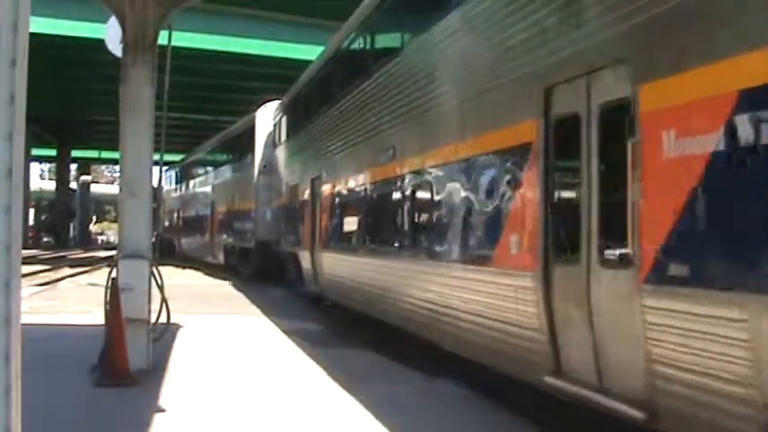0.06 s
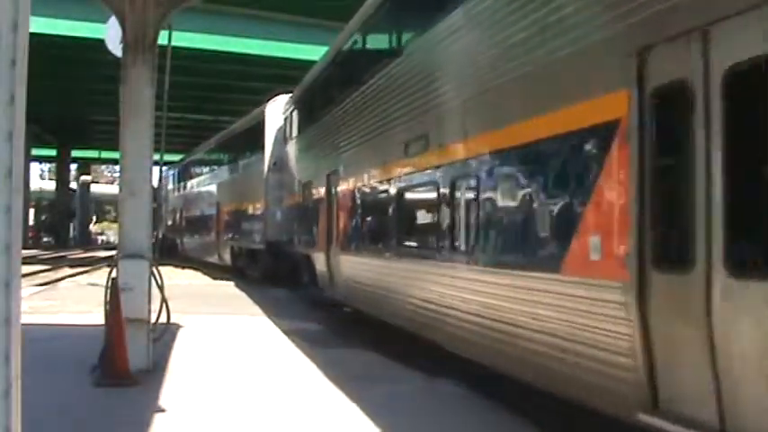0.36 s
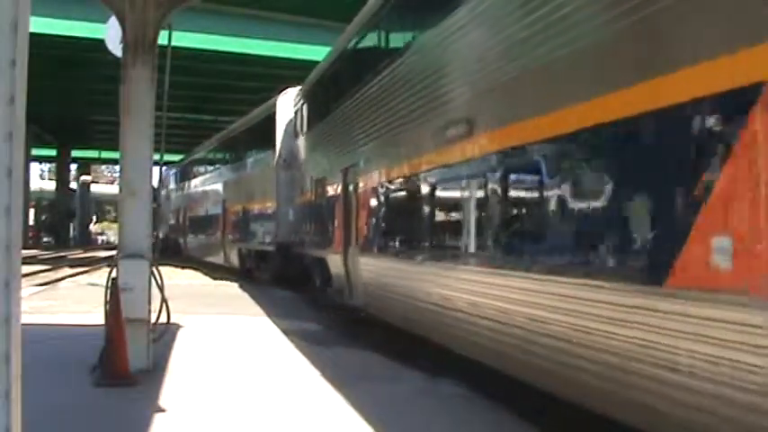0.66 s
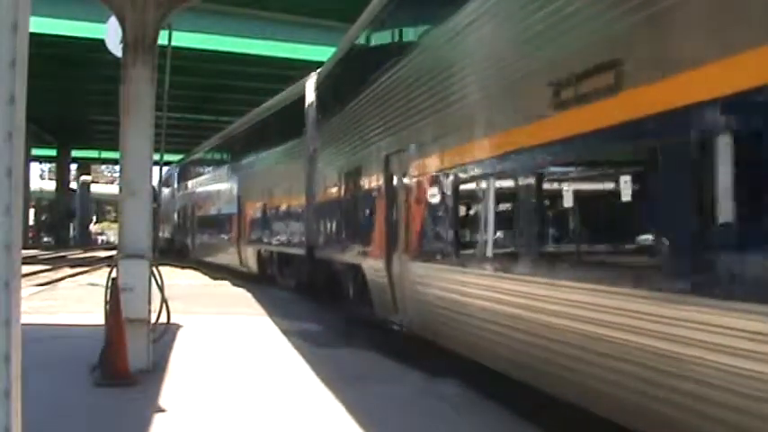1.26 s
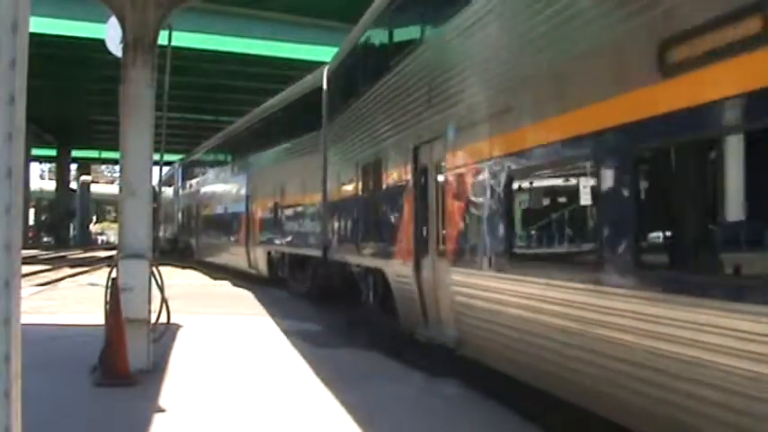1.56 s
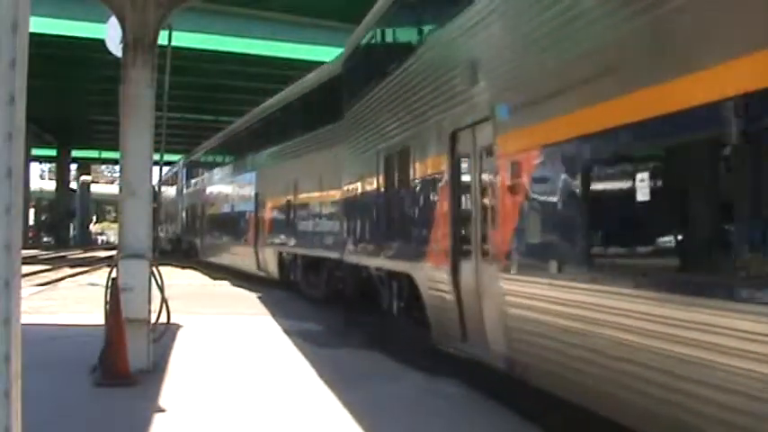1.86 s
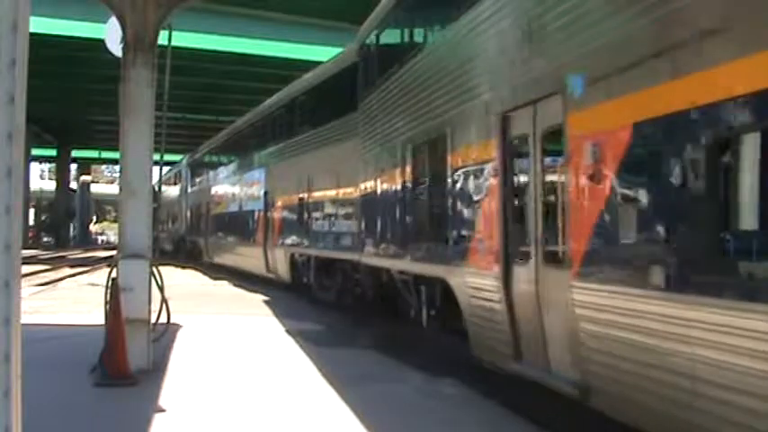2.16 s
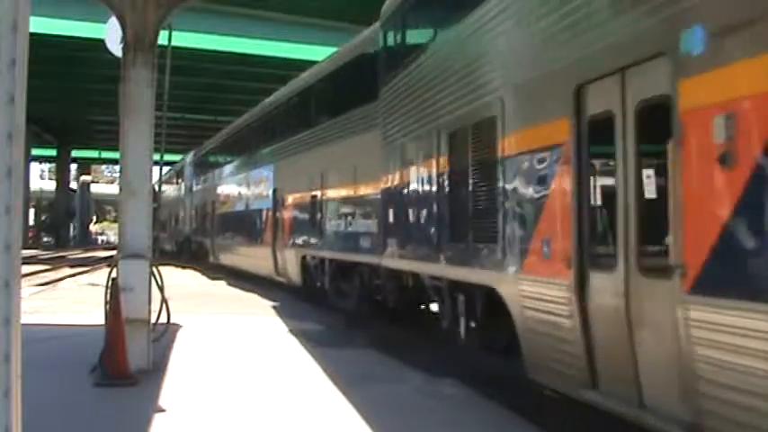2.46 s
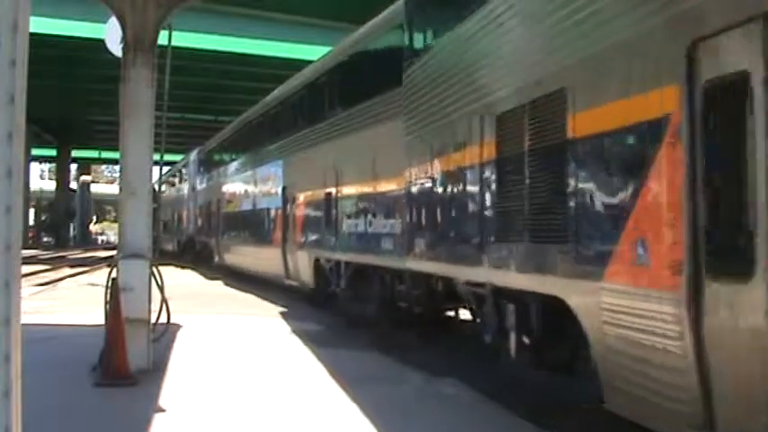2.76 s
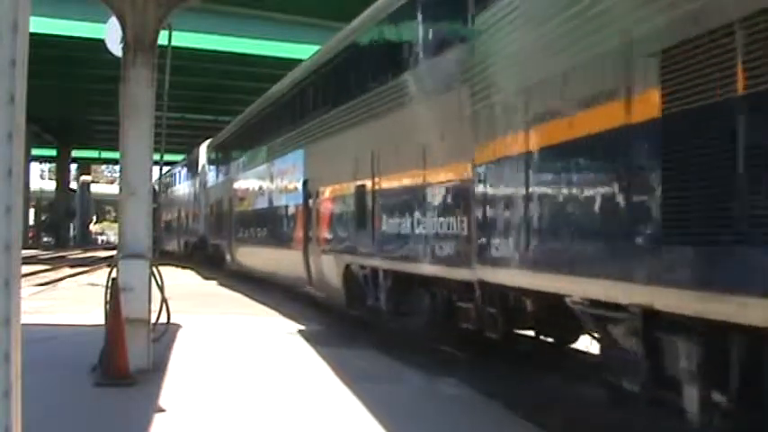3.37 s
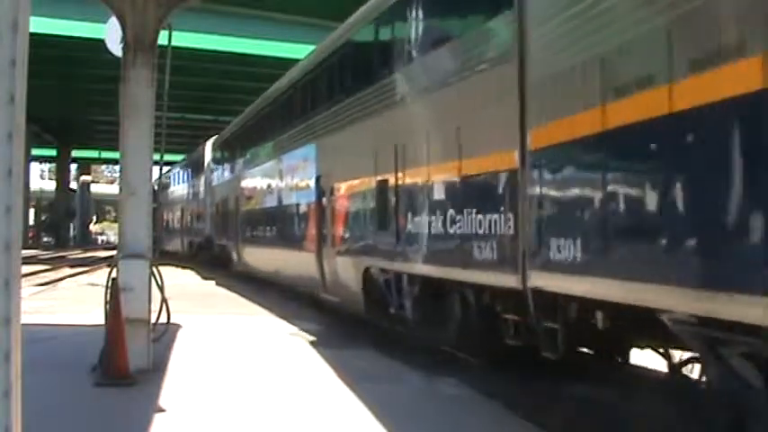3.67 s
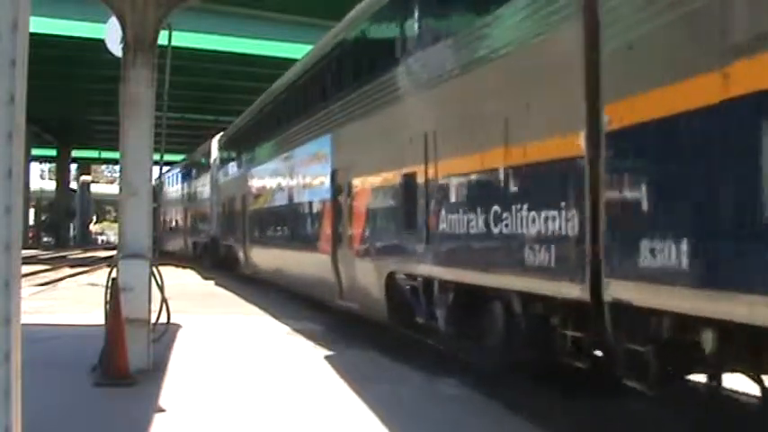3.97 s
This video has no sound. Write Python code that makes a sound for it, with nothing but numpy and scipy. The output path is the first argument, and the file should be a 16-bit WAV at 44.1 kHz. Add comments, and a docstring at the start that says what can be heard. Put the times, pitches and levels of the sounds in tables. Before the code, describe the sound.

A slow passenger train passes close to the microphone on a covered platform, bell clanging evenly over bright hissing air. Wheels clack over rail joints with short squeals, then a deep rumble builds as the hiss and echoing bell weaken.

```python
"""A passenger train rolls slowly along a roofed platform, air hissing and its bell already ringing.
The bell is struck every 0.7 s, hardest near the start; a limiter ducks the hiss under loud strokes.
From the first second on, wheels knock over rail joints and their rims (flanges) rub and sing.
About halfway the hiss fades and the rumble grows. The strokes weaken toward the end as the bell moves
away; motion shifts each echo's pitch differently (Doppler), so the bell's tones pulse against each other."""
import sys
import numpy as np
from scipy import signal
from scipy.io import wavfile
from scipy.ndimage import uniform_filter1d

SR = 44100
rng = np.random.default_rng(int(sys.argv[2]) if len(sys.argv) > 2 else 0)


def wrap_up_sound(samples):
    """Save the sound to the file named by the first command line argument, as 16-bit audio."""
    columns = np.atleast_2d(samples).T
    # keep every value between -1 and 1, then stretch to whole-number steps
    tamed = np.clip(columns, -1, 1)
    steps = np.round(tamed * 32767).astype(np.int16)
    wavfile.write(sys.argv[1], SR, steps)


N = 176400
TIME = np.arange(N) / SR
BLOCK = 40  # samples per step of a slow wander


def from_db(db):
    """Turn decibels into a gain to multiply by."""
    return 10 ** (np.asarray(db) / 20)


def rms_one(x):
    """Scale a signal so its average strength (rms) is 1."""
    return x / np.sqrt(np.mean(x ** 2) + 1e-20)


def level(rows):
    """Join (t/s, level/dB) points into a gain over time."""
    return from_db(np.interp(TIME, *np.transpose(rows)))


def at_hz(points, hz):
    """Read between (f/Hz, value) points, with octaves evenly spaced."""
    f, value = np.transpose(points)
    return np.interp(np.log(hz), np.log(f), value)


def pan(left_db):
    """Left and right gains that make the left louder by left_db."""
    return from_db(np.array([[.5], [-.5]]) * left_db)


def drift(rate_hz):
    """A smooth random wander of typical size 1, one value per block."""
    r = np.exp(-2 * np.pi * BLOCK * rate_hz / SR)
    wander = signal.lfilter([1], [1, -2 * r, r * r], rng.standard_normal(N // BLOCK + 2001))
    return rms_one(wander[2000:])


def resonate(x, hz, width_hz):
    """Make a signal ring around one pitch; white noise keeps its power."""
    r = np.exp(-np.pi * width_hz / SR)
    feedback = [1, -2 * r * np.cos(2 * np.pi * hz / SR), r * r]
    return signal.lfilter(np.sqrt((1 - r * r) / 2) * np.array([1, 0, -1]), feedback, x)


# how alike left and right sound: f/Hz, likeness (1 = the same)
STEREO_LIKENESS = [(40, .98), (200, .96), (500, .8), (1200, .76), (3000, .88), (6000, .94), (10000, .85),
                   (14000, .62)]
# how the sound leans to one side: f/Hz, left minus right/dB
STEREO_BALANCE = [(40, -3.4), (90, -3.2), (300, -.2), (700, -.8), (2000, -2), (6000, -.8), (14000, -1.3)]
def spread(pair, hz):
    """Blend two unrelated noises into left and right, as alike as suits that pitch."""
    alike = np.clip(at_hz(STEREO_LIKENESS, hz), 0, .999)
    mid, side = np.sqrt((1 + alike) / 2), np.sqrt((1 - alike) / 2)
    return (pan(at_hz(STEREO_BALANCE, hz)) * [[mid, side], [mid, -side]]) @ pair


def banded_noise(spectrum, flicker_db, flicker_hz):
    """Stereo noise of strength 1, built from half-octave bands that each flicker a little."""
    out, together = 0, drift(flicker_hz / 2)
    edges = 20.3 * 2 ** np.arange(0, 10.1, .5)
    white = rng.standard_normal((2, 2, N))
    for k, (low, high) in enumerate(zip(edges, edges[1:])):
        hz, flicker = np.sqrt(low * high), drift(flicker_hz)
        if spectrum[0][0] < high and low < spectrum[-1][0]:
            band_pass = signal.butter(2, [low, high], "band", fs=SR, output="sos")
            band = signal.sosfilt(band_pass, white[k % 2])
            gain = from_db(at_hz(spectrum, hz) + flicker_db * (together + flicker) / 2)
            out = out + np.repeat(gain, BLOCK)[:N] * spread(band, hz)
    return rms_one(out)


# steady hums of the cars: f/Hz, width/Hz, level/dB
CAR_DRONES = [(50, 8, -44), (399, 30, -37), (701, 40, -48)]
def car_drones():
    """Steady friction keeps the cars humming at a few pitches."""
    out = 0
    for hz, width_hz, db in CAR_DRONES:
        hum = resonate(rng.standard_normal((2, N)), hz, width_hz)
        hum = resonate(hum, hz, 4 * width_hz)  # trims the noise far from the pitch
        out = out + from_db(db) * spread(rms_one(hum), hz)
    return out


# loudness of the rumble: t/s, level/dB
RUMBLE_LEVEL = [(0, -38), (1, -38), (1.5, -36), (1.75, -30.5), (2.3, -34), (2.8, -33), (3.2, -31), (4, -33)]
# tone color of the rumble: f/Hz, relative level/dB
RUMBLE_SPECTRUM = [(22, -7), (35, -5), (50, -2), (70, -5), (110, -2), (170, -9), (300, -26)]
def rumble():
    """The wheels and frames under the cars rumble deeply, louder from about halfway."""
    return level(RUMBLE_LEVEL) * banded_noise(RUMBLE_SPECTRUM, flicker_db=1.2, flicker_hz=6)


# loudness of the rolling: t/s, level/dB
ROLL_LEVEL = [(0, -29), (.6, -30), (1.1, -31.5), (1.4, -29.5), (1.7, -27), (2, -30), (2.7, -31),
              (3.3, -29.5), (4, -29.5)]
# tone color of the rolling: f/Hz, relative level/dB
ROLL_SPECTRUM = [(100, -3), (160, .5), (250, -.5), (400, -2), (560, -7), (800, -10.5), (1200, -12.5),
                 (2000, -15.5), (4000, -22), (6000, -29)]
def rolling():
    """Rolling wheels make a low, fairly even rush."""
    return level(ROLL_LEVEL) * banded_noise(ROLL_SPECTRUM, flicker_db=1.8, flicker_hz=14)


# loudness of the hiss: t/s, level/dB
HISS_LEVEL = [(0, -22), (.3, -21.5), (.7, -24), (1.05, -23.5), (1.28, -27), (1.48, -24.5), (1.65, -22),
              (1.95, -29.5), (2.3, -29.5), (2.7, -32.5), (3.1, -32), (4, -33.5)]
# tone color of the hiss: f/Hz, relative level/dB
HISS_SPECTRUM = [(1000, -14), (2000, -6.5), (3200, -5), (4800, -4), (6500, 0), (8500, -.4), (10500, -8),
                 (13000, -16), (16000, -29)]
def air_hiss():
    """Air hisses brightly, then fades."""
    return level(HISS_LEVEL) * banded_noise(HISS_SPECTRUM, flicker_db=.8, flicker_hz=8)


# rubs of a wheel's rim on the rail: t/s, length/s, f/Hz, tone level/dB, scrape level/dB
FLANGE_RUBS = [(-.07, .13, 2790, -38, -22), (.43, .31, 2810, -25.5, -37), (1.24, .28, 2775, -31, -27),
               (2.15, .58, 2834, -33.5, -40)]
# tones a wheel sings: multiple of the rub's pitch, waver/Hz, relative level/dB
WHEEL_TONES = [(.669, 20, -9), (1, 20, 0), (1.208, 30, -16), (1.335, 24, -10), (2.066, 30, -8)]
# tone color of the scrape: f/Hz, relative level/dB
SCRAPE_SPECTRUM = [(400, -4), (700, 1), (1500, -5), (3000, -8), (5500, -4), (8000, -11), (12000, -10),
                   (16000, -24)]
def flange_squeals(slip_hz=45, slip_db=4):
    """Each rub swells and fades: the rim sticks and slips, so the wheel's tones waver over a scrape."""
    out = np.zeros((2, N))
    scrape = banded_noise(SCRAPE_SPECTRUM, flicker_db=2.5, flicker_hz=25)
    for start_s, length_s, pitch_hz, tone_db, scrape_db in FLANGE_RUBS:
        on = slice(max(int(start_s * SR), 0), int((start_s + length_s) * SR))
        swell = np.abs(np.sin(np.pi * (TIME[on] - start_s) / length_s))
        out[:, on] += np.sqrt(swell) * from_db(scrape_db) * scrape[:, on]
        for ratio, waver_hz, db in WHEEL_TONES:
            hz = pitch_hz * ratio + waver_hz * np.repeat(drift(slip_hz), BLOCK)[on]
            strength = from_db(tone_db + db + slip_db * np.repeat(drift(slip_hz), BLOCK)[on])
            out[:, on] += pan(left_db=-2) * swell * strength * np.sin(2 * np.pi * np.cumsum(hz) / SR)
    return out


# wheels hitting rail joints: t/s, level/dB, main ring f/Hz
JOINT_KNOCKS = [(.29, -23, 245), (.859, -15.5, 440), (1.265, -28, 600), (1.425, -21.5, 470),
                (1.59, -23, 385), (1.72, -25, 170), (2.04, -30, 330), (2.33, -24, 380), (2.555, -17.5, 460),
                (2.885, -24, 340), (3.114, -15, 390), (3.83, -28, 280)]
# where the wheels and their frame (the truck) ring: f/Hz, width/Hz, relative level/dB
TRUCK_RINGS = [(190, 90, -15), (360, 110, -6), (480, 100, -12), (700, 80, -13), (980, 250, -23),
               (1480, 260, -14), (2400, 900, -22)]
def wheel_knocks(hold_s=.032, fade_s=.09, tail_db=-16, tail_fade_s=.45, dull_hz=1100):
    """A wheel drops over a joint: a brief dull clatter rings the truck, then dies away under the roof."""
    out = np.zeros((2, N + SR))
    age = np.arange(SR // 2) / SR
    hit = from_db(-60 * np.maximum(age - hold_s, 0) / fade_s)
    force = hit + from_db(tail_db - 60 * age / tail_fade_s)
    dull = signal.butter(2, dull_hz, fs=SR, output="sos")
    for start_s, db, main_hz in JOINT_KNOCKS:
        clatter = signal.sosfilt(dull, spread(rng.standard_normal((2, len(age))), main_hz) * force)
        ring = resonate(clatter, main_hz, width_hz=90)
        ring += sum(from_db(ring_db) * resonate(clatter, hz, width) for hz, width, ring_db in TRUCK_RINGS)
        start = int(start_s * SR)
        out[:, start:start + len(age)] += from_db(db) * rms_one(ring) * np.sqrt(np.mean(force ** 2))
    return out[:, :N]


# the clapper hitting the bell: t/s, level/dB, extra treble level/dB
BELL_STROKES = [(-.665, -14, 3), (.049, -10.5, 3.2), (.752, -8, -1.5), (1.460, -12, .8),
                (2.168, -14.3, -2.2), (2.876, -15.5, -1), (3.583, -17, -3.3)]
# the bell's tones at rest (the lowest two pulse together): f/Hz, relative level/dB, time to fade 60 dB/s
BELL_TONES = [(1136, -6, 2.7), (1141, -13, 2.7), (2136, -1.2, .5), (2448, .8, .82), (3928, -14, .6),
              (4082, -1.5, .66), (4885, -14, .5), (6036, -.7, .38), (6467, -17, .5), (8218, -10, .48),
              (10630, -27, .4)]
def bell_metal(t, attack_s=.004, treble_from_hz=1600):
    """Every stroke of the clapper feeds energy to all the bell's tones; each fades at its own pace."""
    stroke_s, stroke_db, treble_db = np.transpose(BELL_STROKES)
    out = 0
    for hz, db, fade_s in BELL_TONES:
        strength = from_db(db + stroke_db + treble_db * (hz > treble_from_hz))
        energy = np.zeros(len(t))
        energy[np.searchsorted(t, stroke_s)] = strength ** 2
        energy = np.abs(uniform_filter1d(energy, int(attack_s * SR) + 1))
        kept_per_sample = from_db(-120 / (fade_s * SR))
        power = signal.lfilter([1], [1, -kept_per_sample], energy)
        out = out + np.sqrt(power) * np.sin(2 * np.pi * (hz * t + rng.random()))
    return out


def moving_bell(speed_m_s=4.3, ahead_m=2.0, aside_m=4.0, direct_db=-10, echoes=20):
    """The bell moves away, heard directly and off cars, roof and pillars, each path at a shifted pitch."""
    t = np.arange(-SR, N + SR // 2) / SR
    metal = bell_metal(t)
    distance_m = np.hypot(ahead_m + speed_m_s * TIME, aside_m)
    delay_s = (distance_m - distance_m[0]) / 343  # sound covers 343 m/s; a growing delay lowers pitch
    out = from_db(direct_db) * np.interp(TIME - delay_s, t, metal) * np.ones((2, 1))
    # near echoes, then quieter and later far ones
    for db, first_s, spread_s, far in [(-1.5, .005, .07, False), (-11, .03, .15, True)]:
        turns, sides = rng.permutation(echoes) / echoes, rng.standard_normal(echoes)
        for k, (turn, side) in enumerate(zip(turns, sides)):
            late_s = first_s + spread_s * ((k + rng.random()) / echoes) ** 1.3
            slant = 2 * turn if far else 1.7 * (turn / 4 + turn ** 5)  # above 1, the path shortens
            sent_s = TIME - delay_s - late_s - slant * (delay_s.mean() - delay_s)
            out += from_db(db) / np.sqrt(echoes) * pan(left_db=6 * side) * np.interp(sent_s, t, metal)
    return out * pan(left_db=-3.8)


def scene():
    """Everything heard from the platform."""
    return moving_bell() + wheel_knocks() + flange_squeals() + air_hiss() + rolling() + rumble() + car_drones()


def record(dry):
    """A fast limiter, deaf to the bass, turns down the loudest moments; the highest treble is cut."""
    limit_db, slope, window_s, release_db_per_s = -16.5, .85, .008, 140
    bass_hz, top_hz = 700, 15650
    sensed = signal.sosfilt(signal.butter(2, bass_hz, "high", fs=SR, output="sos"), dry)
    power = uniform_filter1d(np.mean(sensed ** 2, axis=0), int(window_s * SR) + 1)
    over_db = slope * np.maximum(10 * np.log10(np.abs(power) + 1e-12) - limit_db, 0)
    release_db = release_db_per_s * TIME
    duck_db = np.maximum.accumulate(over_db + release_db) - release_db  # drops at once, recovers steadily
    top_cut = signal.ellip(16, .2, 90, top_hz, fs=SR, output="sos")
    return signal.sosfilt(top_cut, dry * from_db(-duck_db))


dry = scene()
out = record(dry)
wrap_up_sound(out)
```